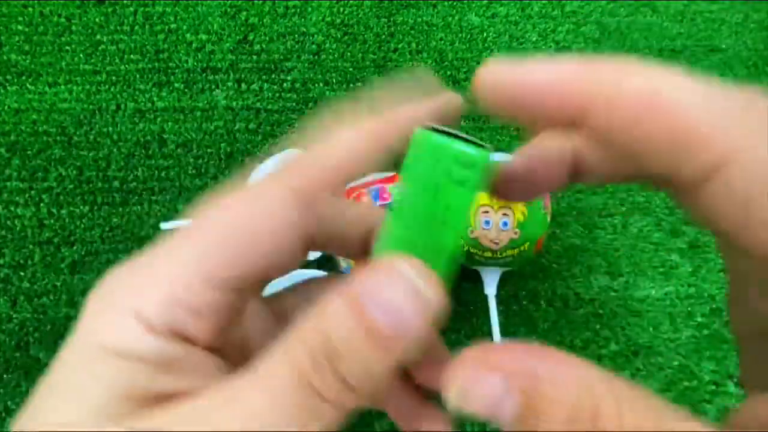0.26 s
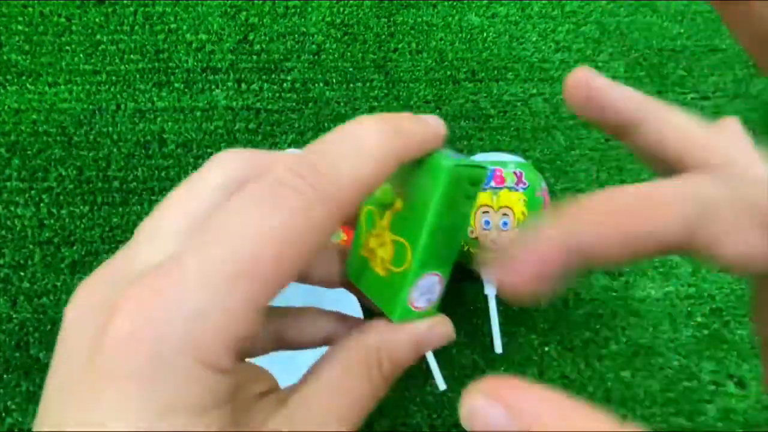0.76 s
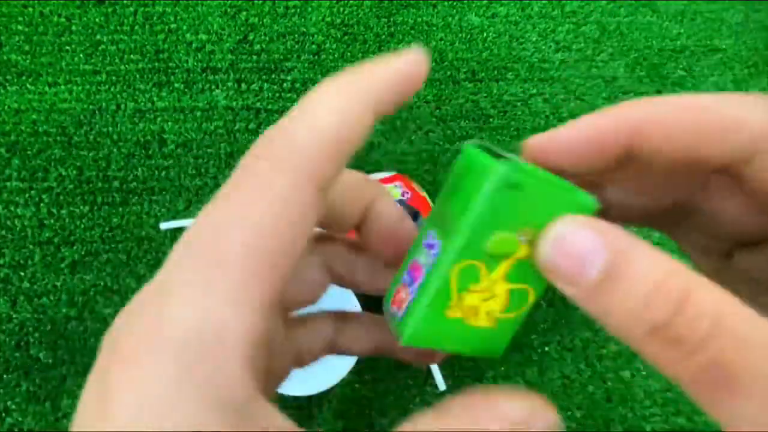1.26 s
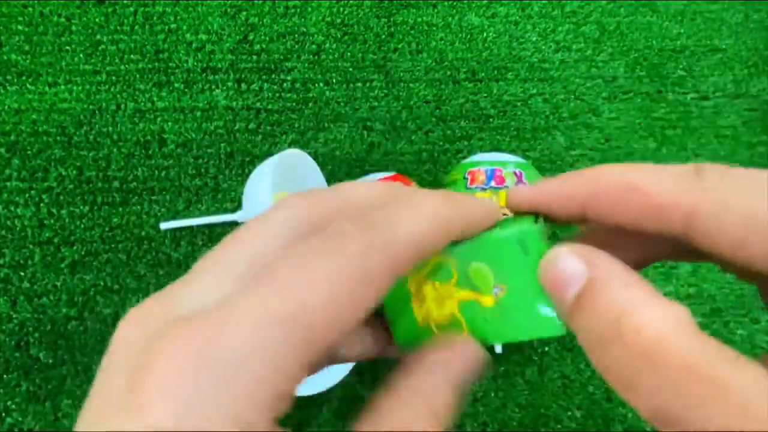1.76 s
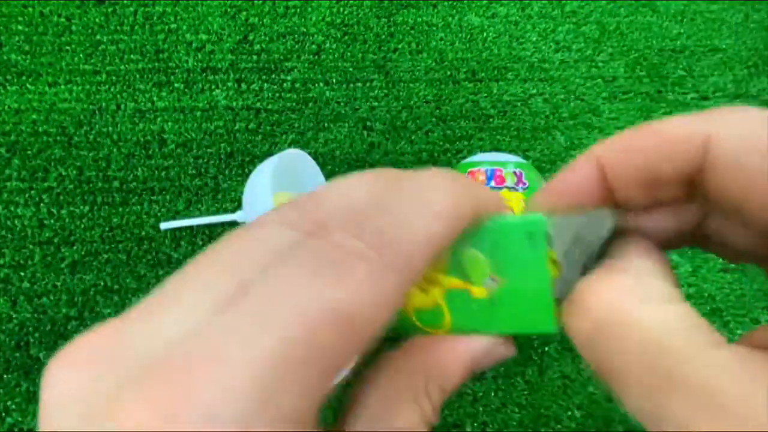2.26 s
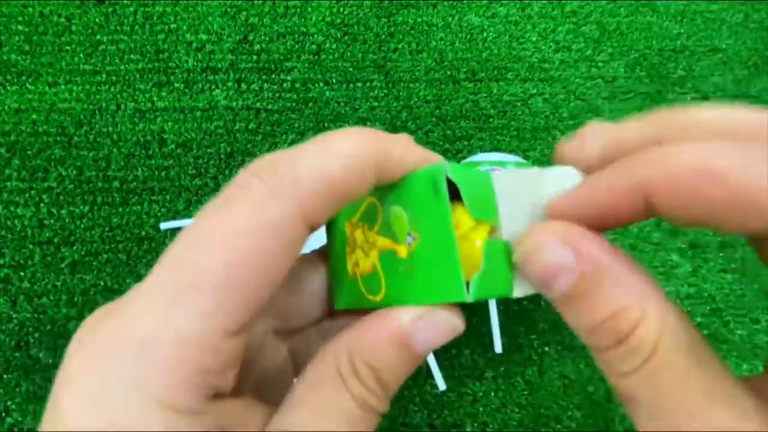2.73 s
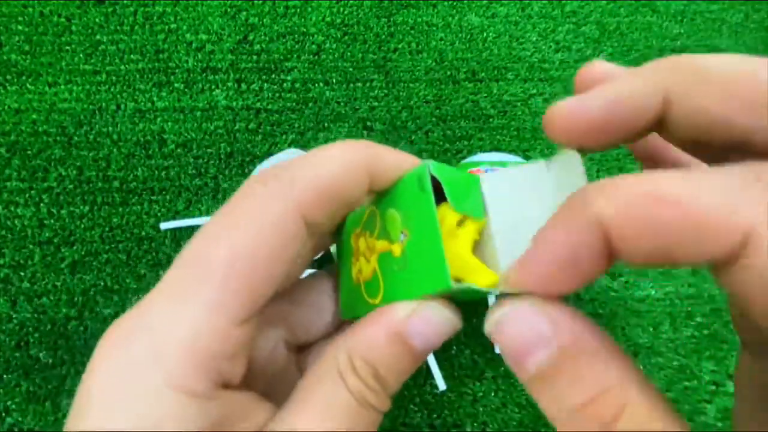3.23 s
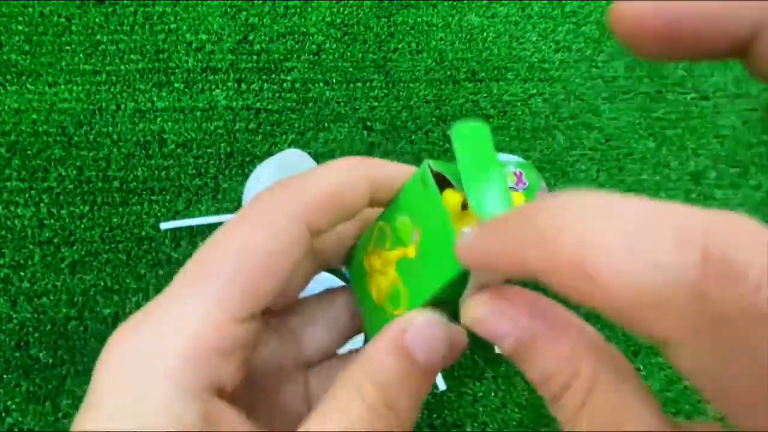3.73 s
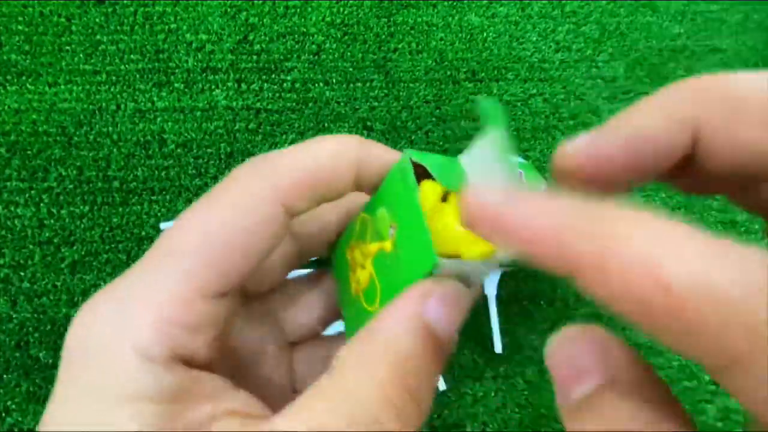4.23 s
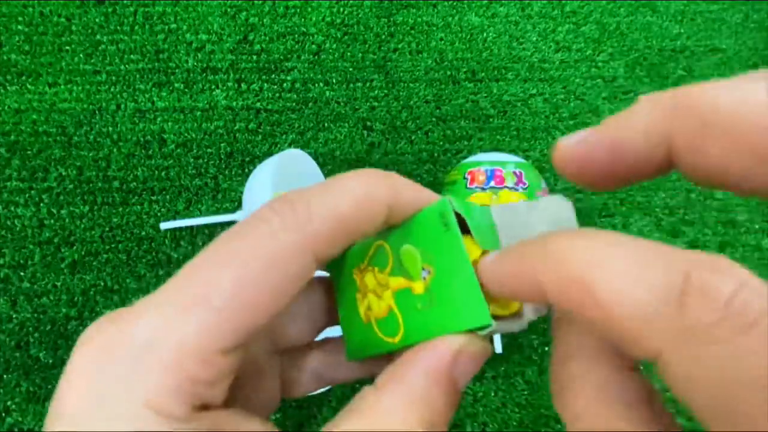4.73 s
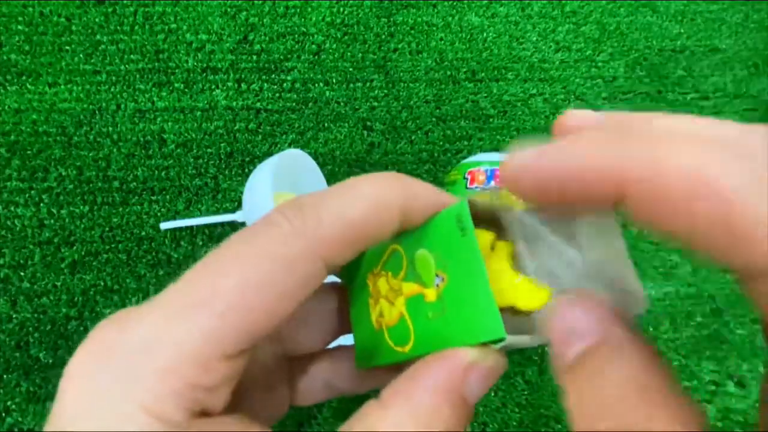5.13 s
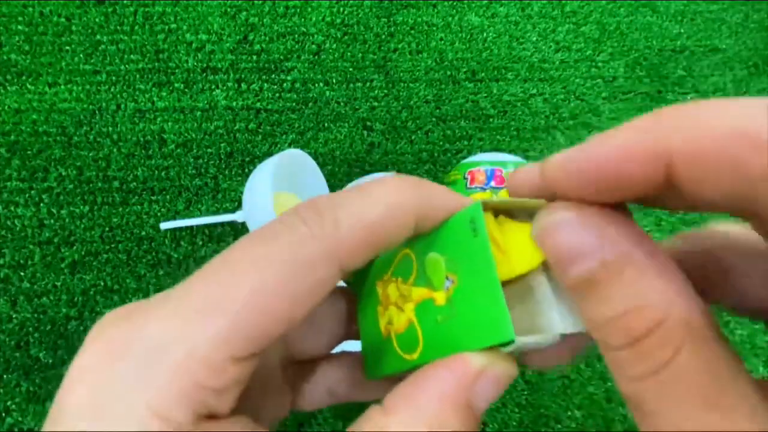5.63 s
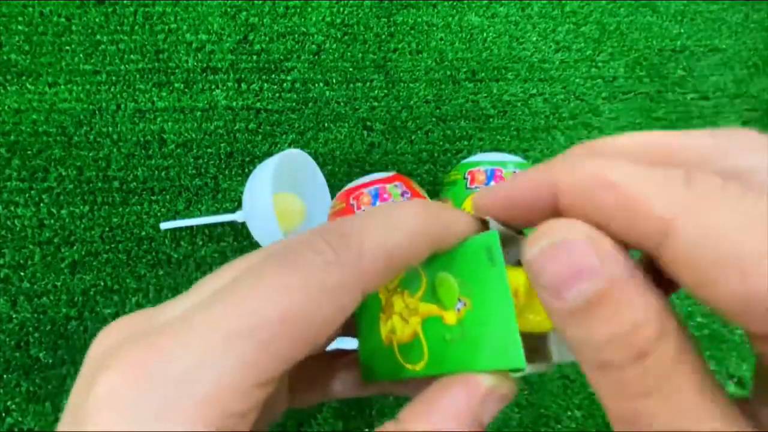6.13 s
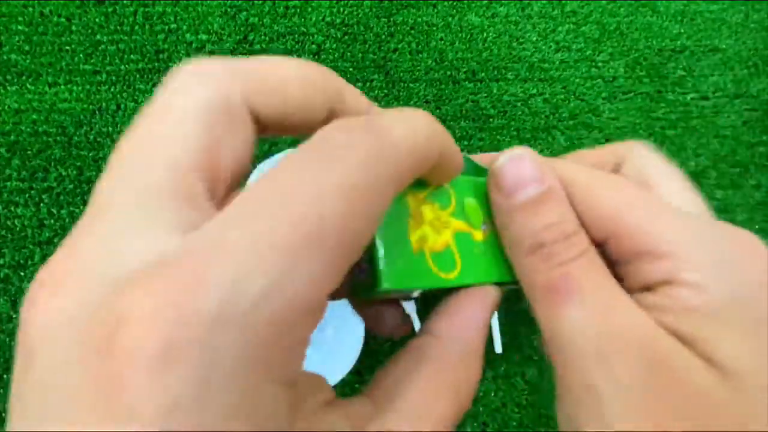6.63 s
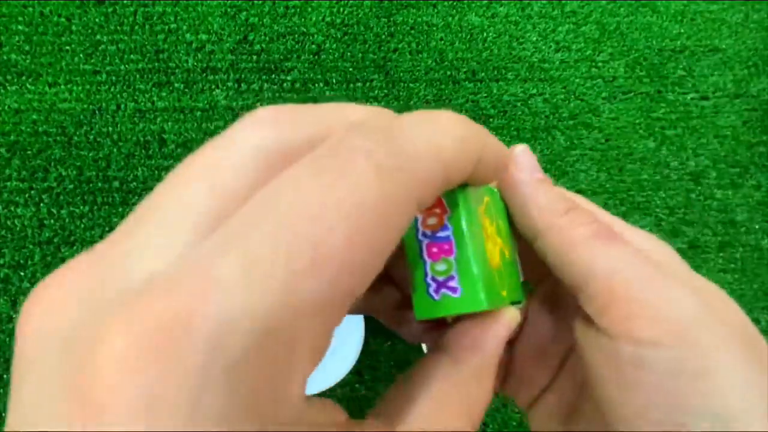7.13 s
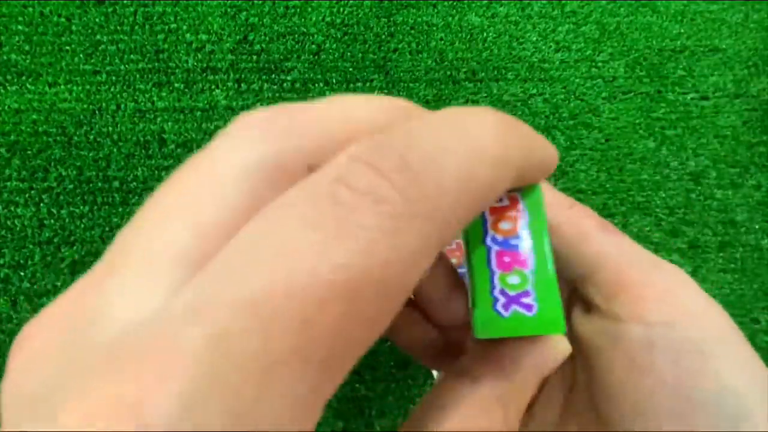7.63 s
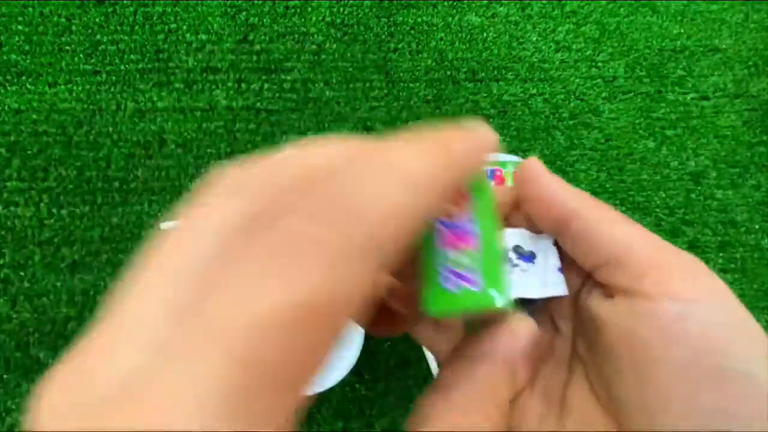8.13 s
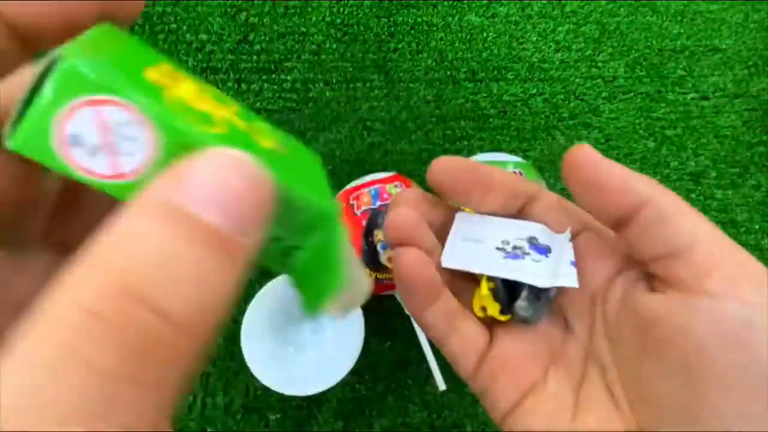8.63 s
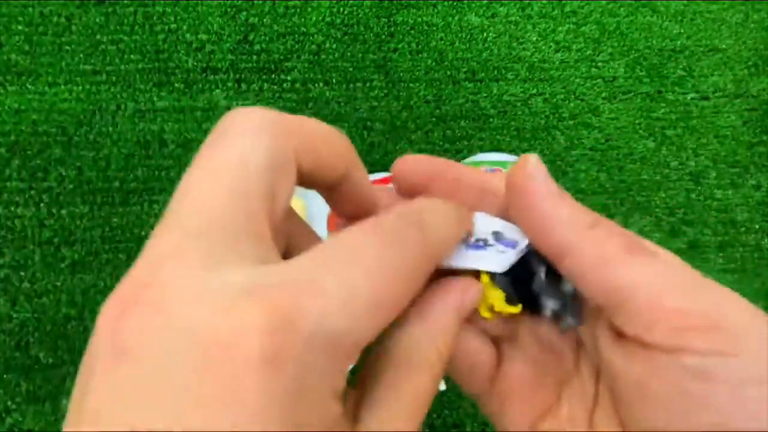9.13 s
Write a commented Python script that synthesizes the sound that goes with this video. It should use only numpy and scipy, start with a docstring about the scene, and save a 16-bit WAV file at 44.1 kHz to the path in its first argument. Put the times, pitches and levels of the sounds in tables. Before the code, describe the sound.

A small cardboard box is handled very close to a stereo microphone in a small, quiet room with low rumble and faint hiss. Firm, dry finger taps land at 0.1, 0.8 and 1.0 s, with soft low bumps of the table and a weaker tap near 0.35. Light scuffs and ticks follow from 1.2, then a hollow knock at 2.0. At 2.2 the seal rips: a loud, bright, snapping burst with crisp clicks. From 2.4 to 4.9, sparse papery scrapes and ticks, stronger around 3.8, as flaps are folded. Between 4.9 and 6.4 the scuffs and small clicks come more densely. From 6.95 to 7.6 fuller card rubbing and bright plastic rattling, then a brief lull. A stronger scrape and clack with a thud hits at 8.35, another soft bump at 8.95, then light rustles and clicks to 9.4.

```python
"""Close to a two-port microphone, fingers tap a small shut cardboard box, rip its seal, fold its flaps open
and shake out plastic parts; arms bump the table, a rumble and faint hiss lie under it all.
Contacts are noise bursts ringing wall, hollow, panel and nail modes; card scuffs are clumped friction noise
through moving wall modes. A resonant high-pass follows the opening; a small room answers with noise tails."""
import sys
import numpy as np
from scipy import signal
from scipy.fft import rfft, irfft, next_fast_len
from scipy.io import wavfile
from scipy.ndimage import map_coordinates

SR = 44100
rng = np.random.default_rng(int(sys.argv[2]) if len(sys.argv) > 2 else 0)


def generate_wav(sig):
    """Save sig (samples, or channels by samples) to the path in sys.argv[1] as 16-bit PCM at SR."""
    pcm = np.round(np.clip(np.atleast_2d(sig).T, -1, 1) * 32767).astype(np.int16)
    wavfile.write(sys.argv[1], SR, pcm)


N = 413216

# air modes in the box, before widening: (frequency [Hz], width [Hz], level [dB])
HOLLOW_MODES = [(140, 90, -18), (250, 140, -14), (470, 220, -8), (720, 200, 3)]
# click modes of the nail, before widening: (frequency [Hz], width [Hz], level [dB])
NAIL_MODES = [(8600, 700, -3), (9400, 700, 0), (10600, 1100, 0), (11800, 800, -7), (15300, 1000, -2)]
# base level of the hollow against the body, rising to a peak at the 1.99 s knock, low again once the box
# opens: (time [s], level [dB])
HOLLOW_LEVEL = [(0.0, -23), (1.5, -13.5), (1.99, -3.5), (2.3, -19.5), (4.0, -21.5), (7.0, -24), (9.37, -26)]


def amp(db):
    """Gain of a level in dB."""
    return 10 ** (np.asarray(db) / 20)


def unit(x):
    """x at rms 1."""
    return x / np.sqrt(np.mean(x ** 2) + 1e-20)


def along(points, hz):
    """Interpolate (frequency [Hz], value) rows on a log frequency axis."""
    f, v = np.transpose(points)
    return np.interp(np.log(hz + 1), np.log(f + 1), v)


def curve(rows):
    """One value per sample from (time [s], value) rows."""
    return np.interp(np.arange(N) / SR, *np.transpose(rows))


def wobble(knots_per_s):
    """A smooth random curve through normally distributed knots."""
    knots = rng.standard_normal(int(N * knots_per_s / SR) + 4)
    return map_coordinates(knots, [np.arange(N) * knots_per_s / SR])


def filtered(x, response):
    """x through a complex frequency response."""
    n = x.shape[-1]
    m = next_fast_len(n + 2048)
    return irfft(rfft(x, m) * response(np.fft.rfftfreq(m, 1 / SR)), m)[..., :n]


def bandpass(f, hz, width_hz):
    """Response of one damped resonance, 1 at its centre."""
    return 1j * f * width_hz / (hz * hz - f * f + 1j * f * width_hz)


def ringing(modes, scatter_db=0, widen=1):
    """Causal response of a mode family, signs alternating, strengths scattered at random by scatter_db."""
    gains = [amp(db + scatter_db * rng.standard_normal()) for _, _, db in modes]

    def response(f):
        return sum((-1) ** k * gain * bandpass(f, hz, width_hz * widen)
                   for k, (gain, (hz, width_hz, _)) in enumerate(zip(gains, modes)))
    return response


def air():
    """The quiet room: unsteady rumble and faint hiss, both mostly shared by the two ports."""
    # traffic and house rumble, before the lift and sway below: (time [s], level [dB])
    rumble_level = [(0.0, -83.5), (0.99, -83), (2.06, -87.5), (7.46, -86), (8.2, -83), (9.37, -79.5)]
    # rumble colour: (frequency [Hz], relative level [dB per Hz])
    rumble_colour = [(15, -55.5), (30, -22), (60, -6.5), (95, -6), (160, -14.5), (400, -20.5), (900, -58)]
    # hiss colour: (frequency [Hz], relative level [dB per Hz])
    hiss_colour = [(100, -33), (400, -18.5), (900, -7.5), (1940, -12.5), (3160, -17), (5880, -15.5),
                   (7500, -20), (10400, -20.5), (13600, -29.5), (16000, -38.5)]
    lift_db, sway_db, hiss_db = 8.0, 2, -78.5
    shared, own = rng.standard_normal(N), rng.standard_normal((2, N))
    rumble = unit(filtered(shared + 0.3 * own, lambda hz: amp(along(rumble_colour, hz))))
    hiss = unit(filtered(3.6 * shared + own, lambda hz: amp(along(hiss_colour, hz))))
    rumble_db = curve(rumble_level) + lift_db + sway_db * (wobble(1.9) + wobble(6.5))
    return amp(rumble_db) * rumble + amp(hiss_db + 1.0 * wobble(1.8)) * hiss


def room(x):
    """Noise tails, each frequency dying at its own speed; a new tail every fifth of a second."""
    # decay time: (frequency [Hz], t60 [s])
    t60 = [(200, .3), (1400, .27), (3700, .25), (10000, .23)]
    step, delay = SR // 5, 300  # samples
    out = np.zeros((2, N + SR))
    for start in range(0, N, step):
        hz, t, z = signal.stft(rng.standard_normal((2, SR // 3)), SR, nperseg=128)
        decay = amp(-60 * t / along(t60, hz)[:, None])
        tail = signal.istft(z * decay, SR, nperseg=128)[1]
        wet = signal.fftconvolve(x[None, start:start + step], tail / np.linalg.norm(tail[0]), axes=1)
        out[:, start + delay:start + delay + wet.shape[1]] += wet
    return out[:, :N]


def bumps():
    """Arms on the table: a soft, low push that dies within a few cycles, with a shorter thud on top."""
    # bumps, level before the gains of push and thud: (time [s], level [dB])
    hits = [(0.093, -43), (0.369, -52), (0.784, -40.5), (0.997, -43), (1.233, -53), (1.489, -53),
            (1.979, -58), (2.208, -59), (3.568, -64), (3.796, -58), (4.346, -52), (5.228, -66.5),
            (8.126, -57), (8.37, -41.5), (8.941, -43)]
    # rows: push, thud
    centre_hz, gain_db = np.array([[62], [150]]), np.array([[8], [3]])
    rise_s, t60_s = np.array([[0.009], [0.003]]), np.array([[0.062], [0.045]])
    pitch_spread_db = 1.5  # of the frequency ratio, 20 dB per decade
    out, t = np.zeros(N + SR), np.arange(SR // 2) / SR
    for time_s, db in hits:
        hz = centre_hz * amp(pitch_spread_db * rng.standard_normal((2, 1)))
        envelope = amp(gain_db - 60 * t / t60_s) * (1 - np.exp(-t / rise_s))
        push = envelope * np.sin(2 * np.pi * hz * t)
        out[round(time_s * SR):][:len(t)] += amp(db) * push.sum(axis=0)
    return out[:N]


def gestures():
    """Strokes swell, hold and fade; power-weighted, the loudest lends most of its gloss and pitch."""
    # skin and parts on card, gloss = panel and nail over walls: (start [s], hold [s], mid-hold level [dB],
    # growth over the hold [dB], gloss [dB], pitch of the walls in play [Hz])
    rows = [(0.0, 0.066, -60.5, -11.5, -12.5, 1830), (0.16, 0.083, -57, -6, -7, 1620),
            (0.298, 0.077, -58.5, 9, -5.5, 1590), (0.436, 0.13, -73, -1.5, -6, 1860),
            (1.235, 0.032, -53.5, -11.5, -12, 1810), (1.597, 0.03, -68.5, -3.5, -8, 1210),
            (1.735, 0.095, -65.5, -9.5, -4, 1940), (1.847, 0.031, -61.5, 0, -3, 1730),
            (1.933, 0.13, -59, -2.5, -5, 1770), (2.212, 0.012, -33.5, 11, 2, 1180),
            (2.323, 0.055, -51.5, -11, -4.5, 1360), (2.446, 0.04, -63, 4, -16, 1610),
            (2.569, 0.067, -52.5, -2, -2.5, 1720), (2.62, 0.022, -60, -8.5, -6.5, 1830),
            (2.745, 0.025, -58, 5, -9, 1540), (2.812, 0.044, -61, -9, 0.5, 1490),
            (2.945, 0.1, -67, -2, -2.5, 1630), (3.173, 0.0231, -58.5, 1, -1.5, 2130),
            (3.241, 0.15, -69, -13, -1, 1910), (3.363, 0.08, -69, 3, 2.5, 1810),
            (3.569, 0.041, -51, -3, -1, 1630), (3.696, 0.031, -58, -13.5, -3, 2290),
            (3.794, 0.061, -47, 1.5, -2.5, 2140), (3.901, 0.02, -61, -5, -6, 1830),
            (4.188, 0.065, -61.5, 15, -5, 1690), (4.32, 0.023, -49, -5, -4.5, 1670),
            (4.423, 0.03, -62, -11.5, -4.5, 1520), (4.464, 0.067, -64.5, 2, 1.5, 2070),
            (4.605, 0.0296, -61.5, 10, -5, 1450), (4.691, 0.049, -75, 11.5, -3.5, 1680),
            (4.815, 0.029, -63.5, 10.5, -12.5, 1740), (4.94, 0.0117, -44.5, 0, -3, 1550),
            (5.003, 0.23, -58, 12.5, -3.5, 2010), (5.276, 0.06, -61, -12.5, -8, 1800),
            (5.36, 0.021, -46.5, 8, -7.5, 1720), (5.44, 0.026, -56.5, -0.5, -2.5, 1810),
            (5.516, 0.02, -56, 6, -13, 1820), (5.564, 0.063, -47.5, -4, -7.5, 1600),
            (5.752, 0.047, -64, 0, -2.5, 1690), (5.934, 0.088, -61, -24, -12.5, 1500),
            (6.004, 0.046, -75.5, 0.5, -17.5, 1550), (6.064, 0.082, -48, -5, -12, 1250),
            (6.331, 0.07, -58, 10, -1.5, 1420), (6.405, 0.14, -66.5, 6.5, -2.5, 1690),
            (6.585, 0.035, -59.5, -2.5, -8, 2070), (6.688, 0.076, -62.5, -9.5, -3, 2000),
            (6.953, 0.09, -44, 11.5, -11.5, 1600), (7.133, 0.056, -48.5, -7, -10.5, 1960),
            (7.267, 0.095, -49.5, 8, -8.5, 1580), (7.428, 0.12, -45.5, 5.5, -5, 1840),
            (7.59, 0.24, -59, -9, -0.5, 1910), (7.804, 0.115, -72, -4.5, 7.5, 2310),
            (8.147, 0.028, -54.5, -10.5, -10.5, 2370), (8.349, 0.036, -38.5, 7.5, -4.5, 1780),
            (8.404, 0.095, -52.5, -2.5, -1.5, 2060), (8.792, 0.05, -61.5, -1.5, -1, 2030),
            (8.882, 0.013, -49, 0.5, -5.5, 2080), (8.923, 0.086, -57, 1, -2, 2290),
            (9.151, 0.086, -58.5, 10.5, -1.5, 2640), (9.27, 0.045, -63.5, 1, 3.5, 2070)]
    swell_db_per_s, fade_db_per_s = 1300, 900
    t = np.arange(0, N / SR + .002, .002)
    start, hold, level_db, growth_db, gloss_db, pitch_hz = np.transpose(rows)[:, :, None]
    held_db = level_db + growth_db * (np.clip((t - start) / hold, 0, 1) - .5)
    swell_db = swell_db_per_s * np.maximum(start - t, 0)
    fade_db = fade_db_per_s * np.maximum(t - start - hold, 0)
    power = amp(2 * np.maximum(held_db - swell_db - fade_db, -200))
    total = power.sum(axis=0)
    gain = np.sqrt(total)
    gloss_db = (power * gloss_db).sum(axis=0) / total
    pitch_hz = (power * pitch_hz).sum(axis=0) / total
    return [np.interp(np.arange(N) / SR, t, track) for track in (gain, gloss_db, pitch_hz)]


def strokes():
    """Sliding catches and slips: friction noise in clumps, dense with tiny snaps, heard through the box."""
    # walls held in the hand: (frequency [Hz], width of each of two cascaded resonances [Hz])
    wall_modes = [(1080, 330), (1320, 380), (1620, 460), (1980, 560), (2420, 660), (2950, 800)]
    slips_per_s, slip_decay_s, slip_min_db, slip_range_db = 130, 0.00041, 1, 9
    below_db_per_octave, above_db_per_octave = 19, 20  # loss of walls away from the pitch

    clumps = amp(2.5 * wobble(60) + 2 * wobble(200))
    slips = (rng.random(N) < slips_per_s / SR) * amp(slip_min_db + slip_range_db * rng.random(N))
    snaps = np.convolve(slips, np.exp(-np.arange(200) / (slip_decay_s * SR)))[:N]
    friction = unit(clumps * (1 + snaps) * rng.standard_normal((2, N)))

    # the grip shifts: the centre moves and each mode comes and goes
    gain, gloss_db, pitch_hz = gestures()
    centre_hz = pitch_hz * amp(.4 * wobble(10))
    wall_gains = []
    for hz, _ in wall_modes:
        octaves = np.log2(hz / centre_hz)
        loss_db = above_db_per_octave * np.maximum(octaves, 0) - below_db_per_octave * np.minimum(octaves, 0)
        wall_gains.append(amp(6.7 * wobble(30) - loss_db))
    wall_gains = np.array(wall_gains)

    def resonated(x, hz, width_hz):
        return unit(filtered(x, lambda f: bandpass(f, hz, width_hz) ** 2))

    walls = [resonated(friction[0], hz, width_hz) for hz, width_hz in wall_modes]
    dull = np.sum(wall_gains * walls, axis=0) / np.linalg.norm(wall_gains, axis=0)
    hollow = amp(curve(HOLLOW_LEVEL) + 2) * unit(filtered(friction[1], ringing(HOLLOW_MODES)))
    panel = resonated(friction[1], 5000, 3400)
    nail = amp(-2.5) * unit(filtered(friction[1], ringing(NAIL_MODES, widen=1.8)))
    return gain * (unit(dull) + hollow + amp(gloss_db + 3.2 * wobble(45)) * (panel + nail))


def contacts():
    """Milliseconds of spiky chatter, longer when harder, ring all modes; returns sound to ports and around."""
    # contacts, before the box mouth: (time [s], body peak [dB], nail over body [dB], pitch of the wall hit [Hz])
    hits = [(0.0894, -17, -18, 2120), (0.0978, -5.5, -18, 1434), (0.354, -25.5, -48.5, 1502),
            (0.374, -46.5, 4, 1780), (0.4675, -42, -16.5, 2069), (0.5147, -47.5, -12, 1470),
            (0.644, -45, -10, 1836), (0.7664, -23, -24, 2346), (0.7753, -5.5, -5.5, 2036),
            (0.9824, -20.5, -14, 2408), (0.9902, -6.5, -6, 1866), (1.2305, -38.5, -7, 2100),
            (1.2346, -28.5, -5.5, 2065), (1.2579, -40.5, -6.5, 2260), (1.299, -40, -23.5, 1560),
            (1.308, -42, -24.5, 2110), (1.4746, -41.5, -8, 1210), (1.482, -39.5, -23, 2250),
            (1.4942, -41, -5, 1400), (1.5105, -47.5, -4.5, 2380), (1.5992, -41, -45, 1190),
            (1.7493, -45.5, -26, 2030), (1.983, -33, -10, 2079), (1.9905, -11.5, -2, 1917),
            (2.1593, -66, 24, 1445), (2.1874, -55.5, -7, 1320.0), (2.217, -15.5, 11.5, 1980),
            (2.2219, -24, 16, 2570.0), (2.224, -16.5, -0.5, 1435), (2.2332, -22.5, -19, 1380),
            (2.3138, -29.5, 4.5, 1624), (2.3169, -16.5, -17.5, 1486), (2.3335, -36, -17.5, 1953),
            (2.411, -38, -14.5, 1533), (2.5333, -41.5, 2.5, 2130), (2.5665, -29.5, -10.5, 1642),
            (2.6181, -37.5, -2.5, 2157), (2.7527, -41.5, -27.5, 1230), (2.925, -33, -23, 1462),
            (3.2439, -40.5, -44, 1660), (3.4167, -53, 16, 1850), (3.6999, -32.5, -6, 2510),
            (3.7902, -28, -28, 1820), (3.8402, -22.5, -3, 2200), (4.1136, -47, -14.5, 1645),
            (4.3258, -37.5, -10, 2054), (4.399, -46.5, -1, 1800.0), (4.5086, -40.5, -6.5, 2170),
            (4.6872, -42.5, -10.5, 1900), (4.9381, -30.5, -10, 1920), (4.9479, -35.5, -22, 1506),
            (5.226, -27.5, -4, 2140), (5.2663, -33.5, 2.5, 2130), (5.317, -39, -5.5, 1400),
            (5.3247, -37.5, 0.5, 3270), (5.3726, -33, -6, 1585), (5.3974, -43, -29.5, 1390),
            (5.4498, -43, -20, 1760), (5.4727, -34, -16.5, 1330), (5.559, -31.5, -25.5, 1908),
            (5.5762, -29.5, -17, 1527), (5.5884, -31.5, -27.5, 1972), (5.736, -39, -4.5, 1580),
            (5.8073, -43, -0.5, 1820), (5.829, -44, -8, 1620), (5.9108, -29.5, -9.5, 1900),
            (5.983, -45, -9.5, 1285), (6.1235, -31.5, -23.5, 1294), (6.2262, -40.0, -16, 1102),
            (6.4362, -29.5, -11, 1320.0), (6.5315, -40.5, -14, 1156), (6.611, -37, -27, 1900),
            (6.8148, -44, -19.5, 1860), (7.0372, -36, -13.5, 1684), (7.0461, -29, -17.5, 1790),
            (7.0624, -39, -16, 2050), (7.0753, -38, -43, 1632), (7.1298, -31.0, -15.5, 1620),
            (7.2, -44, -19.5, 2140), (7.2117, -34.5, -42.5, 1560), (7.502, -25.5, -10, 1890),
            (7.517, -37.5, -10.5, 2040), (7.5291, -28, -14, 2610), (7.5373, -26.5, -5, 2324),
            (7.553, -33.5, 0, 2236), (7.5621, -32, 6.5, 2536), (7.615, -51, 17.5, 2016),
            (7.6406, -44.5, 9.5, 2400), (7.7268, -38.5, -9, 1910), (8.126, -37.5, -2.5, 2240),
            (8.1626, -25.5, -13.5, 2420.0), (8.367, -21.5, -12, 1524), (8.3835, -23.5, -6.5, 1546),
            (8.4519, -31, 3, 2390), (8.5571, -44.5, 11.5, 2460), (8.7741, -40.5, -10.5, 1730),
            (9.219, -39, -7.5, 2860), (9.291, -36.5, 3, 1950), (9.363, -44.5, -7.5, 1400)]
    # card walls, before focus and widening: (frequency [Hz], width [Hz], level [dB])
    body_modes = [(926, 705, 0.5), (1320, 200, 4), (1900, 420, -2.5), (2320, 100, 2.5), (2760, 120, -2.5),
                  (3470, 750, -9)]
    # stiff panel, before widening: (frequency [Hz], width [Hz], level [dB])
    panel_modes = [(3910, 340, 4), (4160, 1700, 2), (5170, 1000, 2), (6700, 390, -2)]
    focus_db_per_octave = 9  # body modes away from the pitch are struck less
    low_damping_db_per_octave = 1.5  # those under it are damped further by the fingers
    own_width_hz, own_db = 260, 1.5  # mode of the wall that is hit, before widening
    panel_base_db, panel_per_sharp, panel_db_per_octave = -0.5, 0.15, 9  # more under sharp, high contacts
    hollow_per_sharp = .35
    main_blow = 2.5 * 2  # within the chatter, over its mean spike
    echo_colour = .35  # share of the struck modes in the sound that reaches the walls

    near, around, t = np.zeros(N + SR), np.zeros(N + SR), np.arange(1536) / SR
    impulse = 1. * (t == 0)
    evens = [filtered(impulse, ringing(modes, widen=3.5))
             for modes in (body_modes, HOLLOW_MODES, panel_modes, NAIL_MODES)]
    for time_s, peak_db, sharp_db, pitch_hz in hits:
        body = [(pitch_hz, own_width_hz, own_db)]
        for hz, width_hz, db in body_modes:
            octaves = np.log2(hz / pitch_hz)
            loss_db = focus_db_per_octave * abs(octaves) + low_damping_db_per_octave * max(-octaves, 0)
            body.append((hz, width_hz, db - loss_db))
        families = (sorted(body), HOLLOW_MODES, panel_modes, NAIL_MODES)

        hollow_db = np.interp(time_s, *np.transpose(HOLLOW_LEVEL)) + hollow_per_sharp * sharp_db
        panel_db = (panel_base_db + panel_per_sharp * sharp_db
                    + panel_db_per_octave * np.log2(pitch_hz / 1800))
        levels_db = peak_db + np.array([0, hollow_db, panel_db, sharp_db])

        length_s = .0042 * amp(.08 * max(levels_db))
        spikes = rng.standard_normal(len(t)) * amp(4 * rng.standard_normal(len(t)))
        chatter = spikes * (1 - np.exp(-(t / .0011) ** 2)) * np.exp(-(t / length_s) ** 2)
        chatter[55:58] += main_blow * np.array([.5, 1, .5]) * np.abs(spikes).mean()

        start = round(time_s * SR)
        for modes, even, db in zip(families, evens, levels_db):
            ring = filtered(chatter, ringing(modes, scatter_db=3, widen=1.4))
            ring = amp(db) * ring / np.abs(ring).max()
            even_ring = even * np.linalg.norm(ring) / np.linalg.norm(even)
            near[start:][:len(t)] += ring
            around[start:][:len(t)] += echo_colour * ring + 0.75 * even_ring
    return near[:N], around[:N]


def mouth(x):
    """The opened box in cupped hands: rings at its mouth, sends out little below (resonant high-pass)."""
    # corner of the high-pass: (time [s], frequency [Hz])
    edge = [(0.0, 145), (2.3, 325.5), (2.9, 560), (5.6, 740), (6.1, 926), (7.0, 1270), (7.5, 1020),
            (8.4, 1320), (9.37, 1050)]
    edge_q, leak_db = 1.048, -12.5
    hz, t, z = signal.stft(x, SR, nperseg=1024, noverlap=896)
    s = 1j * hz[:, None] / np.interp(t, *np.transpose(edge))
    response = (s * s / (s * s + s / edge_q + 1)) ** 2 + amp(leak_db)
    return signal.istft(z * response, SR, nperseg=1024, noverlap=896)[1][..., :N]


def ports(x):
    """Near sound at the two ports: the left leads in phase, each is shaded in its own way."""
    # port level difference: (frequency [Hz], left minus right [dB])
    shade = [(60, -7.5), (250, -12), (600, -5.5), (1290, 0.5), (2380, -3), (4400, -3.5), (9000, -1),
             (15000, 1.5)]
    # port phase difference: (frequency [Hz], lead of the left [rad])
    lead = [(300, .3), (700, .8), (1500, .3), (2500, .8), (3900, 1.5), (5500, 1.7), (7700, 4), (9800, 6),
            (12500, 7.8), (15500, 9.8)]
    side = np.array([[.5], [-.5]])
    return filtered(x, lambda hz: amp(side * along(shade, hz)) * np.exp(1j * side * along(lead, hz)))


def scene():
    """Sum of the box near the ports, its echo, the table and the quiet room."""
    # strength of the echo: (frequency [Hz], level [dB])
    echo_level = [(200, -13.5), (700, -12.5), (1400, -10), (2500, -11.5), (5000, -15), (10000, -10.5),
                  (14000, -33.5)]
    near, around = contacts()
    rubbing = strokes()
    near, around = mouth(np.array([near + rubbing, around + amp(-1.0) * rubbing]))
    echo = room(filtered(around, lambda hz: amp(along(echo_level, hz))))
    table = bumps() * amp([[-.7], [.7]])  # left, right [dB]
    return ports(near) + echo + table + air()


def record(dry):
    """Microphone: the loudest peaks are rounded off, nothing passes above the band limit."""
    top_hz = 16400
    rounded = dry / (1 + np.abs(dry / .95) ** 4) ** .25
    return filtered(rounded, lambda hz: hz < top_hz)


dry = scene()
out = record(dry)
generate_wav(out)
```